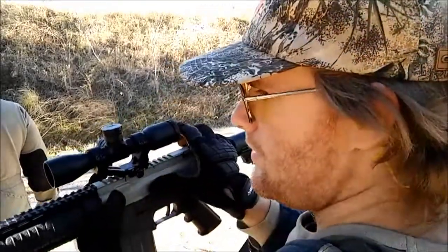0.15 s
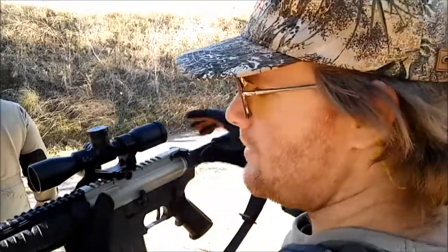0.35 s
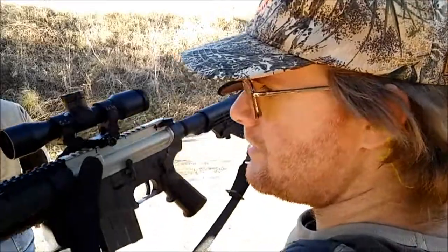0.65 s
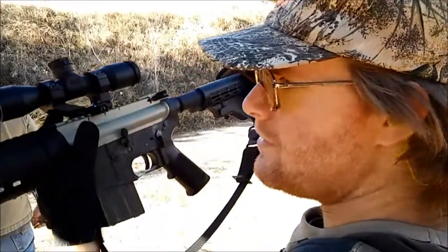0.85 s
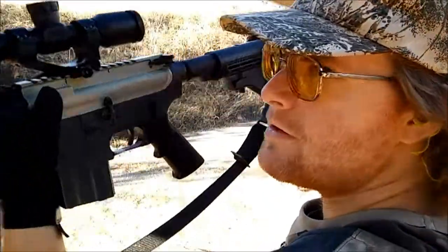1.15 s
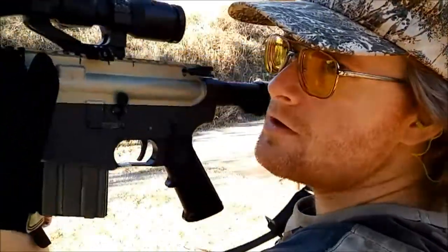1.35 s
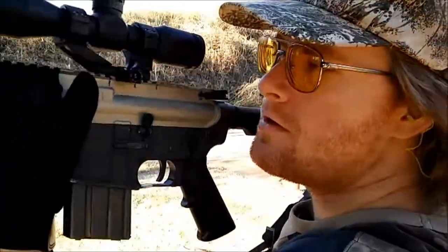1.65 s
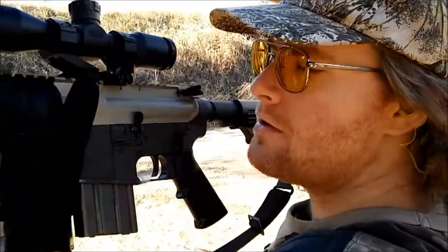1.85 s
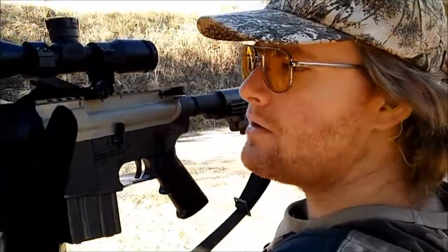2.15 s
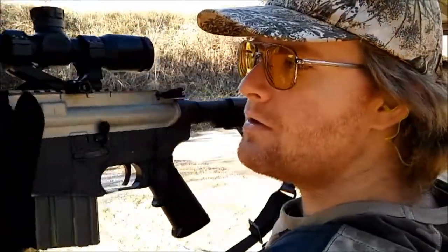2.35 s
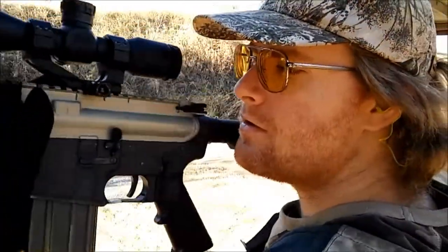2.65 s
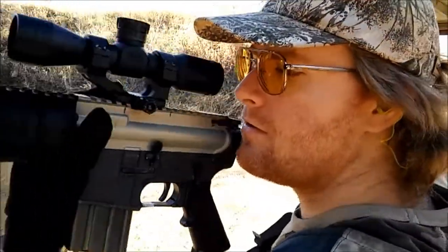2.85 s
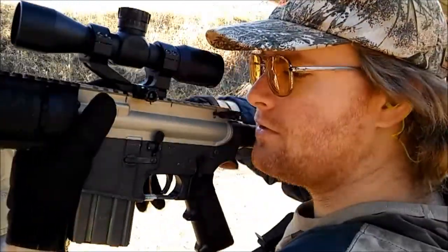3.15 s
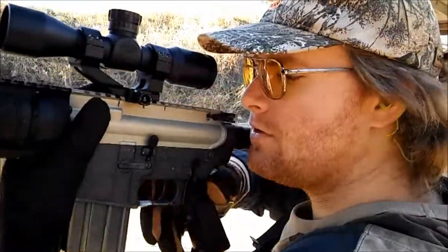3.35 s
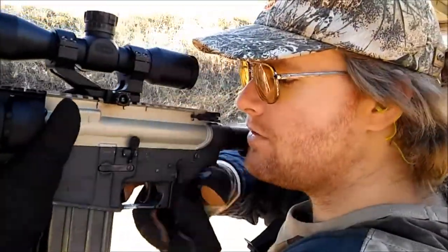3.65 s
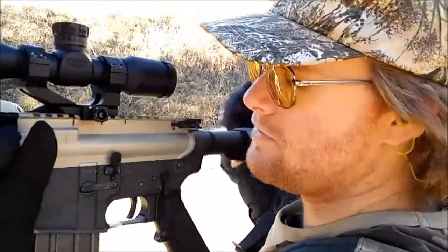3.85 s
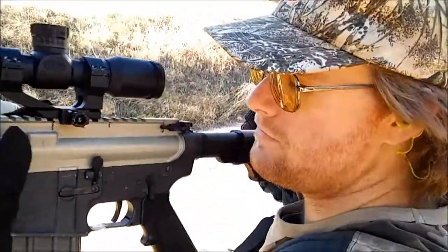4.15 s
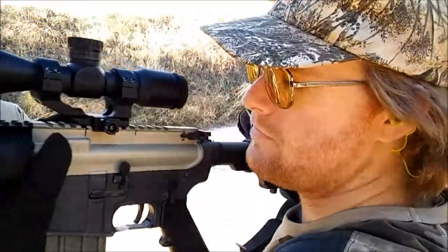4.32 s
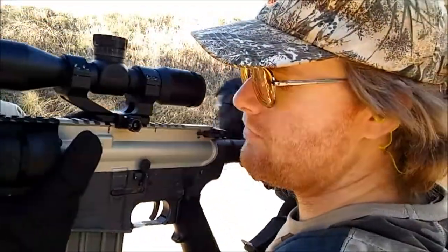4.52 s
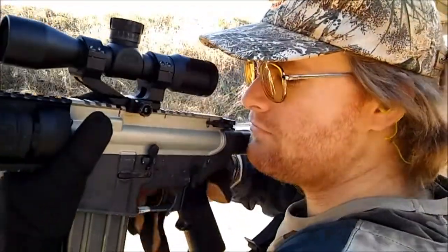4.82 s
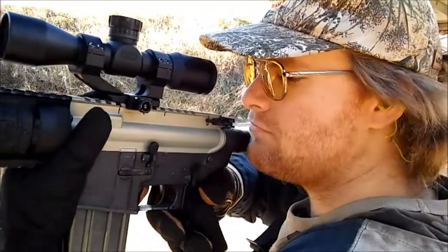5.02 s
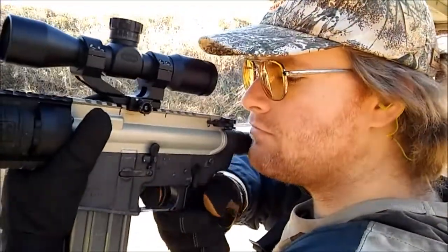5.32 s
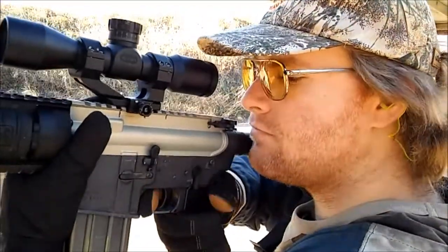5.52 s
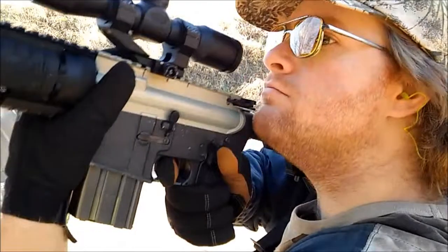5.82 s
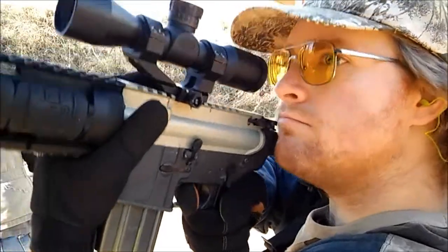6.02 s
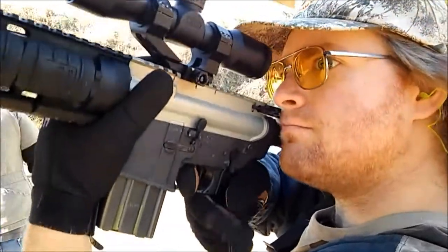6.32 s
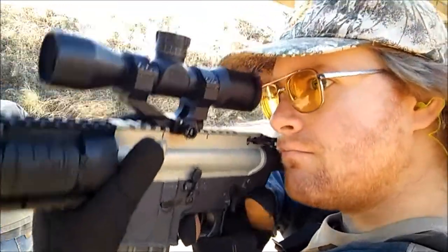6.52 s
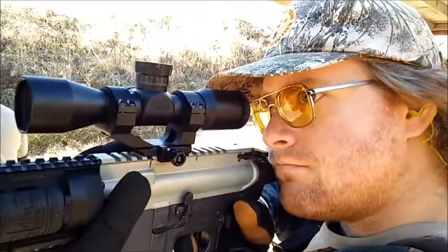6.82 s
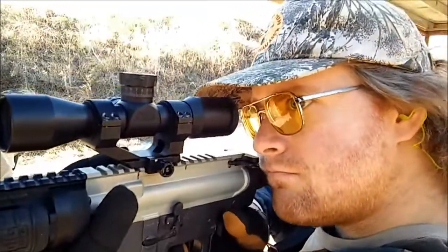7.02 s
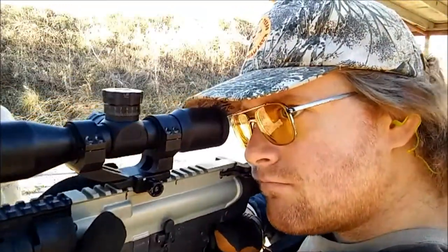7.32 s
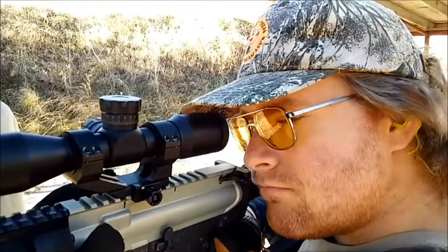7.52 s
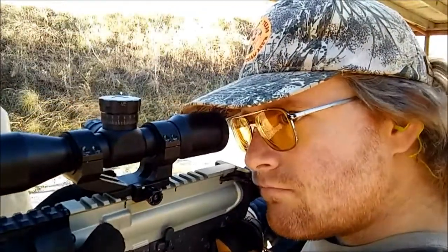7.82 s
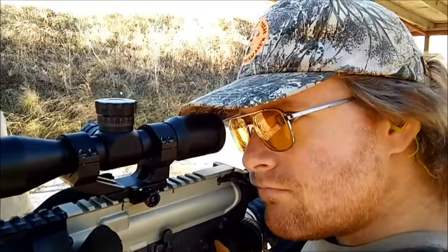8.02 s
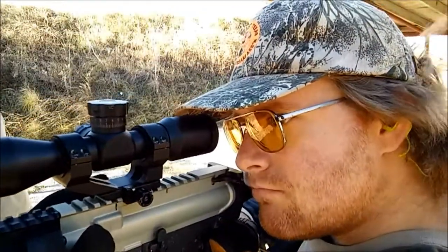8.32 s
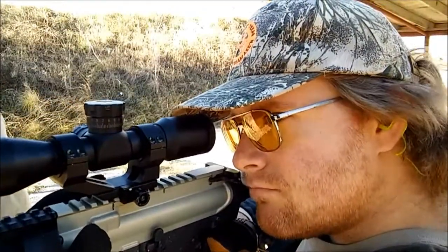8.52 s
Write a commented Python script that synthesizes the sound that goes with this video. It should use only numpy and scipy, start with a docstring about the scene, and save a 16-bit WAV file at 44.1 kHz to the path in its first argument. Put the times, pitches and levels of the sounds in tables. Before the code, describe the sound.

Close metal clicks of a rifle and gear sound over the dying tail of a distant shot, with soft rustling of brush and clothes. The rifle action gives a louder, ringing clack. Gusts hit the small microphone throughout, rumbling, popping and briefly cutting out as they strengthen. Late on, a single gunshot goes off nearby on the open range, its echo returning from the hillsides while the wind carries on.

```python
"""Wind on a firing line

Gusts buffet a small microphone with rumble, eddies and jolts, at times pinning its diaphragm silent.
Close by, rifle actions and gear clack with a crack and a steel ring; brush and clothing rustle.
An earlier shot dies away at the start. Later a nearby shot sends a steep blast front, then a roar
that rolls back from the slopes. Two faint high peeps follow."""
import sys
import numpy as np
from scipy import signal
from scipy.fft import rfft, irfft, next_fast_len
from scipy.io import wavfile
from scipy.ndimage import uniform_filter1d

SR = 44100
rng = np.random.default_rng(int(sys.argv[2]) if len(sys.argv) > 2 else 0)


def digitize_waveform(pressure):
    """Quantize a signal to 16-bit integers and store it at the path in sys.argv[1].

    Rows of a 2-D input are taken as channels; values are limited to [-1, 1].
    """
    field = np.atleast_2d(pressure).T
    bounded = np.clip(field, -1, 1)
    quanta = np.round(bounded * 32767).astype(np.int16)
    wavfile.write(sys.argv[1], SR, quanta)


N = 382347

# wind buffeting: t/s, level/dB
BUFFETING = [(0.0, -33.5), (0.07, -54), (0.17, -31), (0.34, -44.5), (0.58, -32.5), (0.75, -36), (0.92, -55),
             (1.21, -32), (1.52, -33), (1.62, -47.5), (1.66, -36), (1.81, -55.5), (1.91, -39.5),
             (2.03, -48), (2.1, -35), (2.56, -35.5), (2.63, -35.5), (2.7, -39.5), (3.16, -36.5),
             (3.24, -25), (3.28, -33.5), (3.52, -31.5), (3.62, -23.5), (3.79, -37.5), (3.94, -26),
             (4.1, -28), (4.15, -21), (4.2, -33), (4.27, -23), (4.39, -32), (4.44, -22), (4.56, -50),
             (4.59, -23), (4.73, -38), (4.92, -26), (4.95, -28), (5.02, -27), (5.05, -40), (5.14, -26.5),
             (5.55, -23), (5.7, -35.5), (5.77, -26), (5.82, -35.5), (5.87, -25.5), (5.99, -45),
             (6.06, -24.5), (6.18, -31), (6.23, -22), (6.37, -45.5), (6.73, -25), (7.15, -29),
             (7.39, -42.5), (7.46, -34), (7.63, -26), (7.73, -44), (7.9, -28), (8.04, -29.5), (8.43, -24),
             (8.65, -30.5), (8.67, -60)]
# diaphragm pinned at its stop: t/s, length/s
PINNINGS = [(1.5445, 0.0115), (3.203, 0.0065), (3.6692, 0.011), (3.6876, 0.0145), (3.8493, 0.0115),
            (3.9031, 0.014), (4.0363, 0.0115), (4.0678, 0.011), (4.1795, 0.0115), (4.4913, 0.018),
            (4.8909, 0.01), (4.9348, 0.0404), (5.0276, 0.0279), (5.1937, 0.0095), (5.2171, .0065),
            (5.232, .0045), (5.271, 0.0135), (5.3478, 0.022), (5.3863, 0.01), (5.4287, 0.0125),
            (5.5304, 0.0125), (6.0153, .007), (6.0298, 0.01), (6.7302, .007), (6.8975, 0.006),
            (6.9345, 0.006), (7.027, 0.012), (7.9065, 0.009), (7.9938, 0.0155), (8.0327, 0.0469),
            (8.1649, 0.0185), (8.2682, 0.0115), (8.351, 0.0145), (8.5226, 0.0125), (8.6463, 0.0269)]
# noise spectra: f/Hz, level/dB
DULL_SPECTRUM = [(500, 1), (1000, -1), (2500, -8.5), (5500, -11), (7500, -20), (11000, -40.5)]
BRIGHT_SPECTRUM = [(5000, -26.5), (7500, -1), (10000, -0.5), (14000, 5), (16000, -1)]
CRACK_SPECTRUM = [(500, -11.5), (1200, -3.5), (1900, -2.5), (3000, -2.5), (6200, -4.5), (7600, -13.5),
                  (10000, -21)]
LEAD_SAMPLES = 600  # ahead of an eddy's or jolt's centre


def wind():
    """Turbulence comes in lumps over a steadier deep rumble; strong gusts add eddies and jolts."""
    # turbulence spectra: f/Hz, level/dB
    body_spectrum = [(60, -35), (110, -1), (160, 0.5), (240, -1.5), (330, -7), (470, -15), (700, -35.5),
                     (1200, -68.5)]
    edge_spectrum = [(300, -31.5), (550, 9.5), (800, -0.5), (1300, -18), (2500, -24), (4000, -35.5),
                     (9000, -56)]
    deep_spectrum = [(20, -26), (40, -6.5), (60, 4), (100, -2.5), (160, -11), (250, -39)]
    slow_db, = curves(BUFFETING, np.arange(N) / SR)
    level_db = slow_db + 0.5 + flicker(9, N)
    lumps = flicker(45, N)
    body = unit_rms(noise(body_spectrum, N) * gain(4.46 * lumps))
    edge = unit_rms(noise(edge_spectrum, N) * gain(5.9 * lumps + 2.5 * flicker(200, N)))
    edge_db = -21.5 + 0.83 * (level_db + 31)  # stronger wind, sharper eddies
    deep = gain(uniform_filter1d(slow_db, size=9000) + 0.5) * noise(deep_spectrum, N)
    return gain(level_db) * (body + gain(edge_db) * edge) + deep + gust_hits(slow_db)


def gust_hits(wind_db):
    """Eddies hit the port; the diaphragm jolts in gusts and snaps on meeting and leaving its stop."""
    # strongest eddies: t/s, level/dB, f/Hz
    eddies = [(0.6061, -18, 268), (0.7267, -18, 248), (1.2191, -20.5, 264), (1.3886, -16.5, 304),
              (1.4108, -16, 235), (1.5281, -18, 349), (1.9117, -21.5, 203), (2.0875, -17, 274),
              (2.6456, -15, 206.5), (2.9755, -19.5, 230), (3.1961, -13.5, 319), (3.2287, -10, 260),
              (3.5745, -15, 322), (3.6431, -5, 397), (3.9213, -5.5, 250), (4.1435, -10, 309),
              (4.164, -17, 304), (4.4486, -6.5, 270), (4.6082, -19, 227), (4.853, -19.5, 263),
              (4.9049, -10, 350), (4.9249, -15.5, 285), (5.1538, -15, 236), (5.2434, -11.5, 297),
              (5.2646, -9, 308), (5.4421, -9.5, 290), (5.5604, -16, 302), (5.873, -12, 227),
              (6.2286, -15, 228), (6.9094, -9.5, 322), (6.9619, -12.5, 328), (7.4576, -13.5, 288),
              (7.4806, -10.5, 347), (7.4989, -15, 304), (7.834, -16, 347), (8.185, -15.5, 246),
              (8.2454, -16.5, 244), (8.3151, -15, 307), (8.3447, -10.5, 300), (8.381, -12.5, 407),
              (8.4375, -4, 216), (8.459, -7, 213), (8.4962, -8.5, 342), (8.5467, -12, 295),
              (8.6098, -15, 223), (8.6297, -6, 382)]
    # strongest jolts: t/s, level/dB, relative treble/dB
    jolts = [(3.214, -31.5, -9.5), (3.6444, -22, -18), (3.6583, -23, -13), (3.8779, -33, -26),
             (3.9189, -27.5, -9), (3.9237, -27, -32), (4.1133, -29.5, -17), (4.1318, -25.5, -20),
             (4.1416, -25.5, -31), (4.1525, -30.5, -28), (4.2634, -34, -14), (4.3395, -32, -18),
             (4.4, -25.5, -12), (4.4177, -28, -20), (4.906, -22.5, -12.5), (4.9262, -26, -31),
             (5.1529, -35, -16), (5.2424, -30.5, -9.5), (5.2646, -34, -13), (5.4424, -32.5, -13.5),
             (5.4605, -32, -19), (5.502, -24, -40), (5.5595, -34, -15), (6.2156, -36, -18),
             (6.6587, -29, -34), (6.7444, -33, -26), (6.931, -28, -28), (6.9645, -28, -28),
             (7.455, -34, -10), (7.8356, -30, -32), (7.986, -28.5, -11.5), (8.189, -42.5, -24),
             (8.2456, -31.5, -15), (8.385, -37, -34), (8.4467, -26.5, -15.5), (8.4578, -26, -14),
             (8.4698, -26, -22), (8.5372, -37, -12.5), (8.613, -28, -16), (8.6257, -21.5, -15.5)]
    out = np.zeros(N)
    lead_s = LEAD_SAMPLES / SR
    for (s, db, hz), phase in zip(eddies, rng.random(len(eddies))):
        add(out, s - lead_s, eddy(db, hz, phase))
    for (s, db, treble_db), sign in zip(jolts, rng.choice([-1, 1], len(jolts))):
        add(out, s - lead_s, jolt(db, sign, treble_db))
    for (s, length_s), (enter, leave) in zip(PINNINGS, rng.standard_normal((len(PINNINGS), 2))):
        snap_db = wind_db[round(s * SR)] - 14.5
        sign = np.sign(enter)
        add(out, s - 0.001 - lead_s, jolt(snap_db + 3 * enter, sign, treble_db=-17.5))
        add(out, s + length_s + 0.001 - lead_s, jolt(snap_db + 3 * leave, -sign, treble_db=-17.5))
    for s, db, spread in gust_events(base_per_s=12):
        add(out, s, eddy(db + 10, hz=260 * (1 + 0.2 * spread), phase_cycles=3 * spread))
    for s, db, spread in gust_events(base_per_s=13):
        add(out, s, jolt(db - 15 + 3 * abs(spread), np.sign(spread), treble_db=-16))
    return out


def eddy(db, hz, phase_cycles):
    """Thump at the port: about 1.5 cycles of a low tone."""
    t = np.arange(-LEAD_SAMPLES, 900) / SR
    return gain(db) * np.cos(2 * np.pi * (hz * t + phase_cycles)) * np.exp(-(hz * t / 0.45) ** 2)


def jolt(db, sign, treble_db):
    """Rounded push on the diaphragm with a sharp tip; the housing answers with a hollow knock."""
    t = np.arange(-LEAD_SAMPLES, 900) / SR
    push = np.exp(-(t / 0.00034) ** 2)
    tip = 2.38 * gain(treble_db) * np.exp(1 - np.hypot(t, 6e-5) / 1e-4)
    knock_hz = 1900 * rng.uniform(0.59, 1.357)
    knock = gain(-22) * (t > 0) * np.exp(-abs(t) / 0.00053) * np.sin(2 * np.pi * knock_hz * t)
    return sign * gain(db + 10.5) * (push + tip + knock)


def gust_events(base_per_s):
    """Random moments, denser in strong wind: t/s, wind level/dB, uniform draw of variance 1."""
    base_db, gustiness = -27.5, 1.6
    position, chance, spread = rng.random((3, 400))
    s = position * N / SR
    wind_db, = curves(BUFFETING, s)
    per_s = base_per_s * gain(gustiness * (wind_db - base_db))
    kept = chance < per_s * N / SR / len(s)
    return np.transpose([s, wind_db, (spread - 0.5) * np.sqrt(12)])[kept]


def blast_front(db, width_s):
    """Steep pressure jump and rebound."""
    u = np.arange(400) / SR / width_s
    return -gain(db) * (1 - u) * np.exp(-u)


def roar(db):
    """Dense reflections of a muzzle blast, then returns from a slope and a farther ridge."""
    # bass, middle and treble spectra: f/Hz, level/dB
    bass = [(120, -26), (250, -6), (390, 3.5), (600, -2), (900, 0), (1400, -4.5), (2200, -30)]
    middle = [(900, -33), (1500, -3), (2200, 1), (4000, -2.5), (6200, -11.5), (7800, -36), (10000, -37)]
    treble = [(4500, -22), (6800, 4.5), (9300, -2.5), (13800, -0.5), (16000, -8)]
    # envelope per band: level/dB, hold/s, fall/(dB/s), then the same for the far returns
    bands = [(0.5, 0.043, 162, -29.5, 0.067, 57.5), (-10, .11, 151, -33.5, .05, 115.5),
             (-0.5, 0.015, 113.5, -24, 0.068, 153), (-6.5, 0.011, 188, -55, .05, 120.5)]
    returns = ((0.31, 0), (0.49, -16.5))  # delay/s, level/dB
    t = np.arange(0, 0.85, 1 / SR)
    out = np.zeros(len(t))
    for spectrum, band in zip((bass, DULL_SPECTRUM, middle, treble), bands):
        near = swell(t, *band[:3], rise_s=0.016)
        far = sum(gain(echo_db) * swell(t - s, *band[3:], rise_s=0.032) for s, echo_db in returns)
        out += np.hypot(near, far) * noise(spectrum, len(t))
    arrivals_db = 1.2 * flicker(44, len(t))  # separate echoes stand out
    fade = np.minimum(1, (t[-1] - t) / 0.17)
    return gain(db + arrivals_db) * out * fade


def clack(db, part_hz, t60_s, ring_db):
    """Struck part: short crack, rattling steel, duller scatter from shelter and ground."""
    # steel modes: f/Hz, level/dB, t60/s
    modes = [(1660, -8.5, 0.16), (1800, -6.5, 0.073), (2320, -9.5, 0.1), (3430, -3.5, 0.043),
             (3820, -2.5, 0.039), (4320, -6.5, 0.16), (4870, -14.5, 0.082), (5420, 4, 0.023),
             (6500, -18.5, .08), (8310, -22, .1), (11700, -17.5, 0.087), (13610, -12, .1)]
    t = np.arange(9000) / SR
    part = noise([(part_hz / 1.45, -25), (part_hz, 0), (part_hz * 1.45, -25)], len(t))
    body = unit_rms(noise(CRACK_SPECTRUM, len(t)) + 0.91 * part)
    treble_db = -10 + 3.5 * np.log2(part_hz / 3000)  # small parts crack brighter
    treble = gain(treble_db) * noise(BRIGHT_SPECTRUM, len(t))
    crack = (body + treble) * gain(-60 * t / t60_s)
    scatter = body * gain(-60 * t / 0.35) + treble * gain(-60 * t / 0.27)
    scatter *= 1 - np.exp(-t / 0.0012)
    scatter_db = -32.5 - 0.35 * db  # faint knocks are farther off: more scatter
    hz, mode_db, mode_t60_s = np.transpose(modes)[:, :, None]
    mode_db = mode_db - 20 * abs(np.log2(hz / part_hz)) + 5 * rng.standard_normal(hz.shape)
    rattle_db = 4.7 * flicker(70, len(t) * len(modes)).reshape(len(modes), -1)  # loose parts stutter
    tones = np.sin(2 * np.pi * (hz * t + rng.random(hz.shape)))
    ring = (gain(mode_db + rattle_db - 60 * t / mode_t60_s) * tones).sum(0)
    attack = 1 - np.exp(-(t / 0.00074) ** 2)
    return gain(db) * (crack + gain(scatter_db) * scatter + gain(ring_db) * ring) * attack


def scrape(length_s, db):
    """Sliding part, louder as it speeds up."""
    t = np.arange(0, length_s, 1 / SR)
    ramp_db = 24.6 * (t / length_s - 0.5)
    return gain(db + ramp_db + 0.9 * flicker(300, len(t))) * noise(CRACK_SPECTRUM, len(t))


def rustle():
    """Brush and clothing: wavering dull and bright hiss."""
    # hiss levels: t/s, dull/dB, bright/dB
    levels = [(0.0, -53.5, -84), (0.22, -61, -68), (0.38, -63.5, -86), (1.2, -66, -82.5), (1.45, -61, -79),
              (1.76, -58.5, -72), (2.0, -64.5, -79.5), (3.19, -63.5, -80), (3.4, -67, -74),
              (3.55, -54, -56.5), (3.72, -60.5, -67), (4.1, -62, -77), (4.85, -62, -68.5),
              (5.4, -61.5, -84), (5.84, -57, -60), (5.96, -60, -70), (6.5, -59, -74), (6.7, -62.5, -70),
              (6.93, -62, -73.5), (7.63, -60.5, -79.5), (8.67, -61.5, -74.5)]
    dull_db, bright_db = curves(levels, np.arange(N) / SR)
    waver_db = 2.2 * flicker(27, N)
    dull = gain(dull_db + waver_db + 2.5) * noise(DULL_SPECTRUM, N)
    return dull + gain(bright_db + waver_db) * noise(BRIGHT_SPECTRUM, N)


def peep(length_s, hz, db):
    """Thin windowed tone."""
    t = np.arange(0, length_s, 1 / SR)
    return gain(db) * np.sin(2 * np.pi * hz * t) * np.hanning(len(t))


def gain(db):
    """Decibels to amplitude."""
    return 10 ** (np.asarray(db) / 20)


def unit_rms(x):
    """Scales to rms 1."""
    return x / np.sqrt(np.mean(x ** 2) + 1e-20)


def add(mix, s, sound):
    """Mixes a sound in at time s."""
    at = round(s * SR)
    sound = sound[max(-at, 0):]
    part = mix[max(at, 0):][:len(sound)]
    part += sound[:len(part)]


def noise(spectrum, size):
    """Shaped noise, rms 1."""
    f, db = np.transpose(spectrum)
    fft_size = next_fast_len(size)
    hz = np.fft.rfftfreq(fft_size, 1 / SR)
    colour = gain(np.interp(np.log(hz + 1), np.log(f), db, right=-120))
    return unit_rms(irfft(rfft(rng.standard_normal(fft_size)) * colour, fft_size)[:size])


def flicker(top_hz, size):
    """Random modulation, flat to top_hz, rms 1."""
    return noise([(1, 0), (top_hz, 0), (2 * top_hz, -30)], size)


def curves(rows, t):
    """Table columns interpolated at times t."""
    s, *columns = np.transpose(rows)
    return [np.interp(t, s, column) for column in columns]


def swell(t, db, hold_s, fall_db_per_s, rise_s):
    """Rise, hold and decay envelope."""
    return np.clip(t / rise_s, 0, 1) * gain(db - fall_db_per_s * np.maximum(t - rise_s - hold_s, 0))


def scene():
    """Wind, rustle, gear, shots and peeps in mono."""
    # rifle and gear knocks: t/s, level/dB, part f/Hz, crack t60/s, relative ring/dB
    clacks = [(0.1375, -7, 5840, 0.015, -20), (0.1625, -11, 1760, 0.016, -16.5),
              (0.1658, -15, 2460, 0.018, -17), (0.167, -13, 1960, 0.022, -14),
              (0.1732, -4.5, 6540, 0.018, -19), (.175, -13.5, 3920, 0.0068, -23),
              (.189, -15, 5130, 0.013, -21.5), (.201, -28.5, 3800, 0.11, -20),
              (0.3098, -31, 3280, 0.012, -7), (0.3757, -50, 4960, 0.02, -19), (0.408, -48, 1540, 0.035, -9),
              (0.5793, -50.5, 4550, 0.024, -13), (0.7182, -33, 1500, 0.017, -13.5),
              (.796, -47, 1790, 0.019, -16), (0.817, -53, 1610, 0.21, -3), (1.3, -63, 5350, .2, -16),
              (1.4523, -49, 4000, .016, -21), (1.609, -42.5, 1730, 0.046, -25),
              (1.686, -47, 1650, 0.02, -12), (1.714, -21.5, 3230, 0.023, -21),
              (1.721, -30.5, 1870, 0.02, -13), (1.838, -38.5, 1750, 0.027, -6),
              (1.955, -41.5, 1660, .03, -19), (2.13, -45, 5260, 0.057, -17), (2.142, -37, 5950, .022, -16),
              (2.499, -27.5, 5160, 0.024, -20), (2.52, -46, 1640, .04, -7),
              (2.5648, -43.5, 4600, 0.032, -14), (2.812, -51, 1480, .018, -17), (2.9, -57, 6150, 0.016, -9),
              (3.034, -59, 5300, 0.015, -5), (3.256, -10, 5300, 0.014, -16), (3.26, -25, 2200, 0.026, -9.5),
              (3.2975, -13, 1730, 0.019, -5), (3.301, -8, 5940, .025, -3.5), (3.309, -23.5, 4340, .03, 7),
              (3.323, -19.5, 3400, 0.03, -12), (3.3344, -21.5, 4320, .015, -8),
              (3.741, -43.5, 3340, 0.024, -18), (4.049, -40.5, 4620, 0.012, -13),
              (4.605, -38.5, 3550, 0.028, -16), (5.662, -46, 1490, 0.02, -18), (6.133, -45, 4900, 0.023, 1),
              (6.1772, -42, 2500, 0.016, -2), (6.24, -44, 4800, 0.17, -20), (6.527, -44, 3820, .017, -18.5),
              (6.983, -24, 5700, .016, -7), (6.9978, -38, 5900, 0.17, -9), (7.699, -44, 1750, 0.016, -10),
              (7.8284, -50, 1770, .06, -24)]
    # parts scraping before a knock: start/s, end/s, midpoint level/dB
    scrapes = [(3.274, 3.306, -30), (6.963, 6.987, -47.5)]
    # blast wave and first echoes: t/s, level/dB, width/s
    fronts = [(7.0397, -4, .0004), (7.0409, -6, .00025), (7.0433, -4, .0005), (7.0445, -7, .0003)]
    # roars of the shots: t/s, level/dB
    shots = [(-.42, -19.5), (7.04, -13)]
    # high peeps: t/s, length/s, f/Hz, level/dB
    peeps = [(7.86, 0.053, 8750, -59), (7.899, 0.028, 8640, -53)]
    mix = wind() + rustle()
    for s, *row in clacks:
        add(mix, s, clack(*row))
    for s, end_s, db in scrapes:
        add(mix, s, scrape(end_s - s, db))
    for s, db, width_s in fronts:
        add(mix, s, blast_front(db, width_s))
    for s, db in shots:
        add(mix, s, roar(db))
    for s, *row in peeps:
        add(mix, s, peep(*row))
    return mix[None]


def record(dry):
    """Microphone: a pinned diaphragm holds still; port resonance, low cuts, soft clip, hiss, high cut."""
    port_hz, low_cut_hz, coupling_hz, high_cut_hz, ceiling = 4020, 120, 38, 15100, 0.56
    brief_pinnings = [(s, 0.005 * (1 + 0.28 * spread)) for s, _, spread in gust_events(base_per_s=3.5)]
    free = np.ones(N)
    for s, length_s in PINNINGS + brief_pinnings:
        free[round(s * SR):round((s + length_s) * SR)] = 0
    swing_slope = 25 * flicker(4.5, N) / SR  # slow pressure swing
    slope = np.diff(dry[0], prepend=0) + swing_slope
    diaphragm = np.cumsum(slope * uniform_filter1d(free, size=9))
    voltage = diaphragm + 0.077 * signal.lfilter(*signal.iirpeak(port_hz, Q=25, fs=SR), diaphragm)
    for hz in (low_cut_hz, coupling_hz):
        voltage = signal.sosfilt(signal.butter(2, hz, "high", fs=SR, output="sos"), voltage)
    clipped = ceiling * np.tanh(voltage / ceiling)
    self_noise = gain(-76.5) * rng.standard_normal(N)
    high_cut = signal.firwin(255, high_cut_hz, window=("kaiser", 8), fs=SR)
    return signal.oaconvolve(clipped + self_noise, high_cut, "same")[None]


dry = scene()
out = record(dry)
digitize_waveform(out)
```